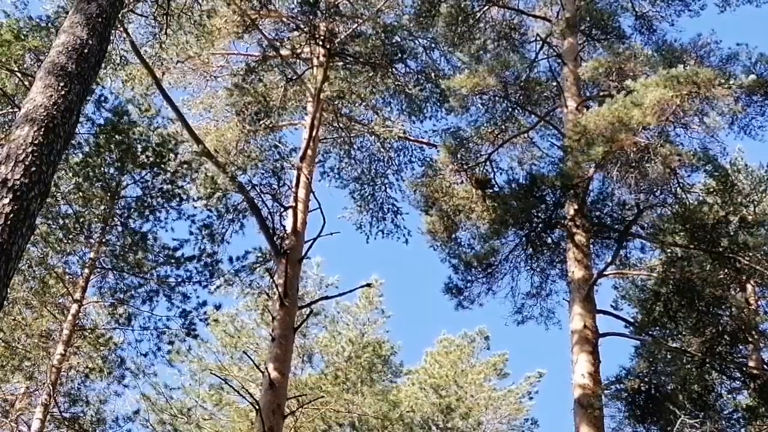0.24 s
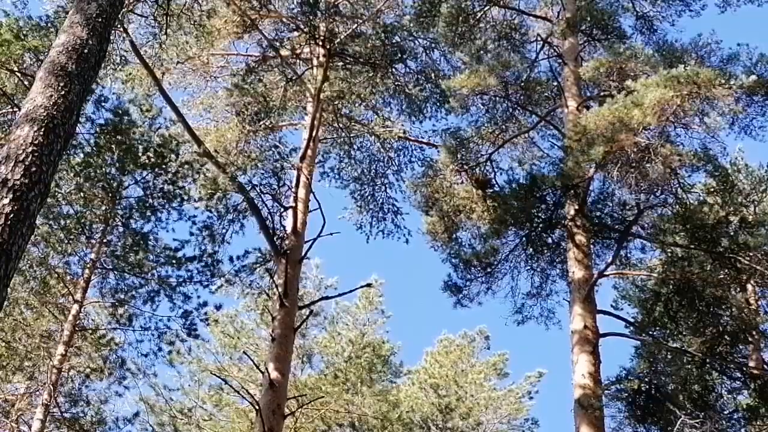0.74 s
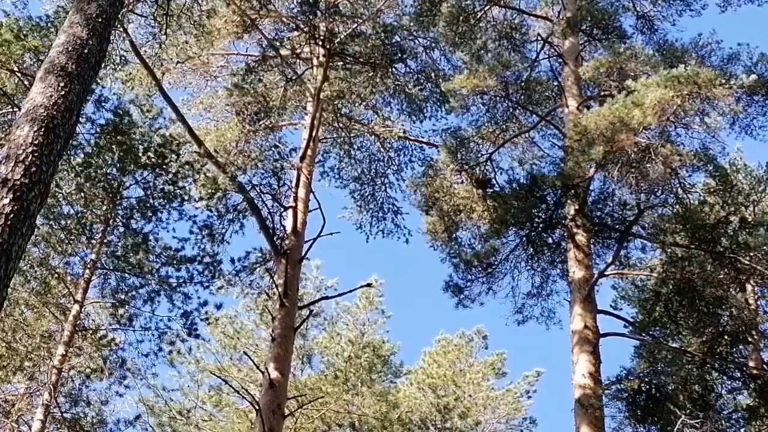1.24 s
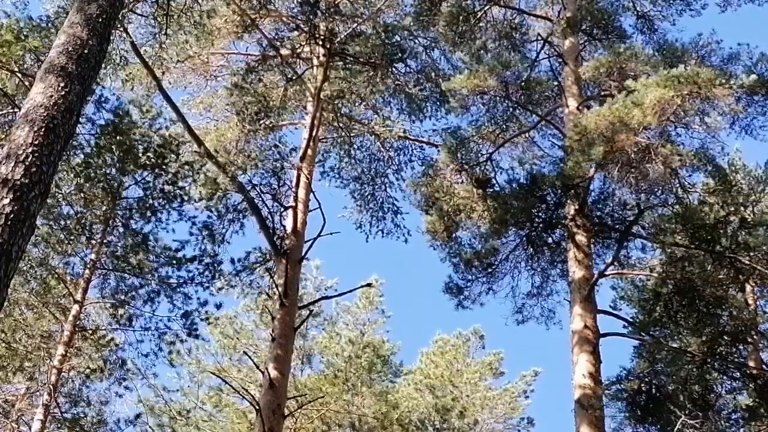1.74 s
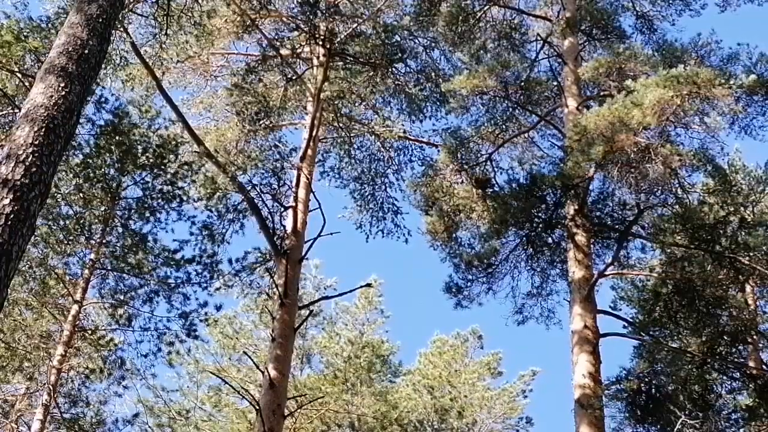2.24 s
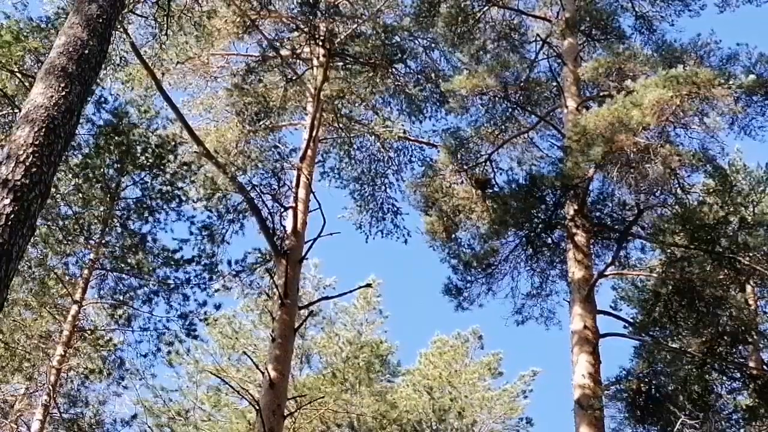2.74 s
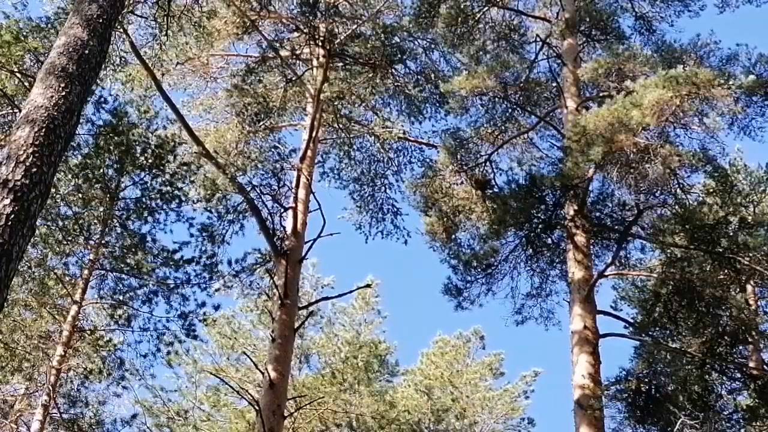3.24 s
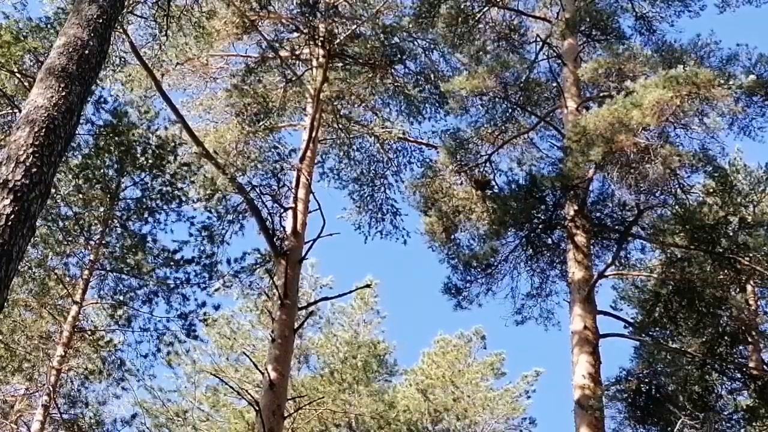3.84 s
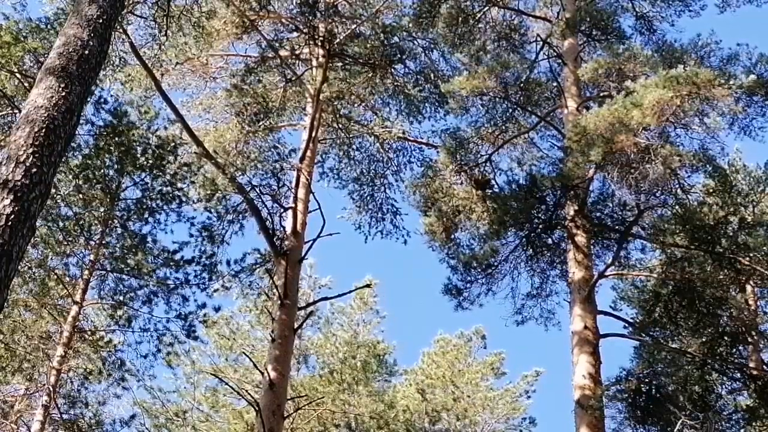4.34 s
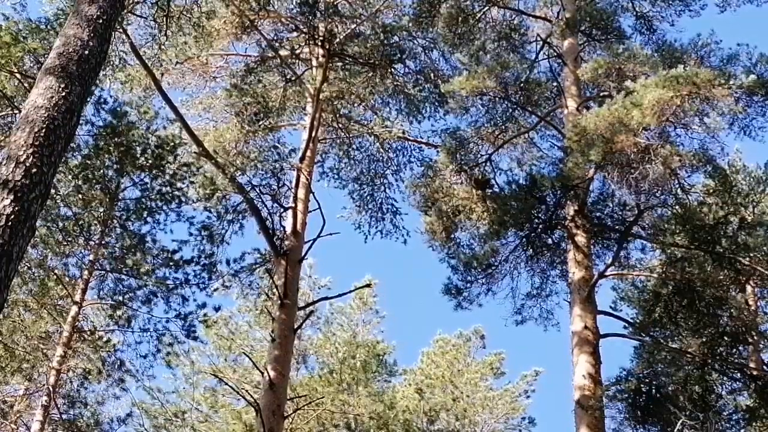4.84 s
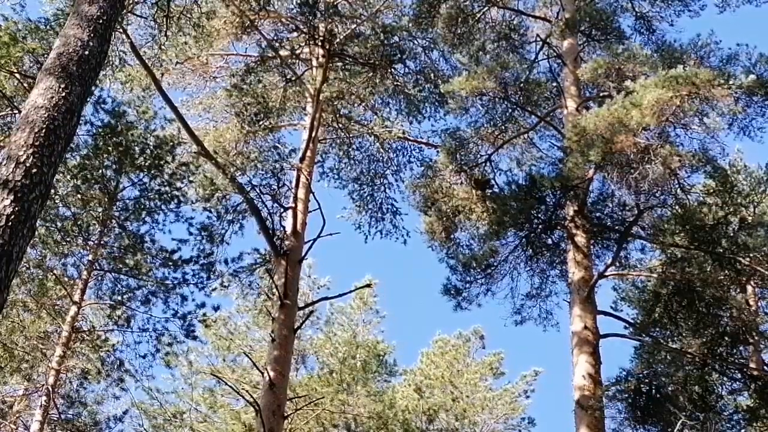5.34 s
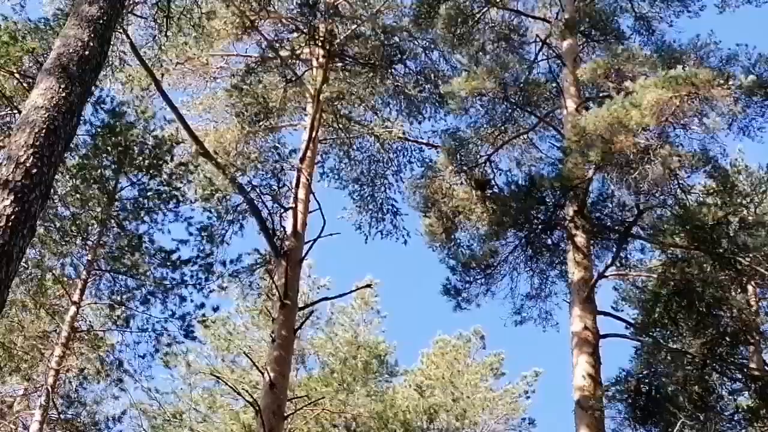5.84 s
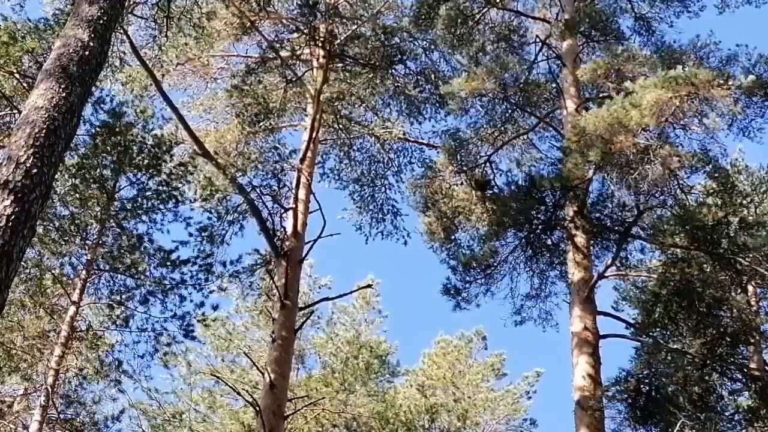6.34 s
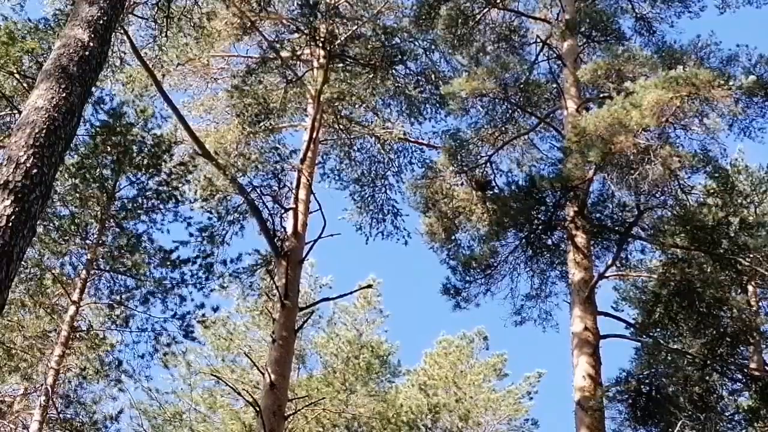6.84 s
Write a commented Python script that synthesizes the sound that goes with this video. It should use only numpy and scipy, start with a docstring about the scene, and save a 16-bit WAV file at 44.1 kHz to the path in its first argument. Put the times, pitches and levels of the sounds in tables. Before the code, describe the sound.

Spring birdsong among tall pines: bright descending finch trills, piercing thin whistles ending in a buzz and sharp note, distant twittering, soft wind.

```python
"""Birds in a spring pine forest

A finch sings its falling trill and flourish twice, built from gliding and fast-wobbling tones.
A nearer bird calls twice: two thin two-voiced whistles, a buzz and a loud rising note.
Other birds call further off as short glides, and a faint squeal holds one pitch.
Random echoes scatter every note as trunks do, over shaped noise for the wind in the crowns.
"""
import sys
import numpy as np
from scipy import signal
from scipy.fft import rfft, irfft, next_fast_len
from scipy.io import wavfile
from scipy.ndimage import uniform_filter1d

SR = 44100
rng = np.random.default_rng(int(sys.argv[2]) if len(sys.argv) > 2 else 0)


def file_out(sig):
    """Save sig as 16-bit WAV at sys.argv[1]."""
    # one column per channel
    cols = np.atleast_2d(sig).T
    # limit, then scale
    lim = np.clip(cols, -1, 1)
    pcm = np.round(lim * 32767).astype(np.int16)
    wavfile.write(sys.argv[1], SR, pcm)


N = 312669


def gain_of(db):
    """Turns decibels into a factor for the sound wave."""
    return 10 ** (np.asarray(db) / 20)


def evened(x):
    """Scales a signal to an average (rms) strength of 1."""
    return x / np.sqrt(np.mean(x ** 2) + 1e-20)


def read(points, hz):
    """Reads a table between its points, with pitch spaced as the ear hears it (logarithmically)."""
    f, value = np.transpose(points)
    return np.interp(np.log(hz + 1), np.log(f + 1), value)


def wander(n, rate_hz):
    """A smooth random curve of strength about 1; a higher rate makes it wander faster."""
    size = next_fast_len(n + SR // 8)
    hz = np.fft.rfftfreq(size, 1 / SR)
    smoothed = rfft(rng.standard_normal(size)) * np.exp(-(hz / rate_hz) ** 2)
    return evened(irfft(smoothed, size))[:n]


def turns(hz):
    """Adds up a pitch curve into the running phase of a vibration."""
    return 2 * np.pi * np.cumsum(hz) / SR


def fade(n, edge_s):
    """A soft start and end."""
    return signal.windows.tukey(n, min(1, 2 * edge_s * SR / n))


def add(mix, s, sound, pan_db=0):
    """Places a sound at a time and a side; positive pan_db makes the left louder."""
    part = mix[:, max(0, round(s * SR)):][:, :len(sound)]
    sides = gain_of(np.array([[.5], [-.5]]) * pan_db)
    part += (sound * sides)[:, :part.shape[1]]


def arrive(x, lag_ms):
    """Sound from one side reaches the right microphone later."""
    lag = int(round(lag_ms * SR / 1000))
    return np.array([x[0], np.roll(x[1], lag)])


def forest(x, early_s=0.023, early_db=6):
    """Trunks and branches scatter sound: strong near echoes, then a tail whose top treble dies first."""
    # time the late echoes take to fall by 60 dB: f/Hz, fall time/s
    echo_times = [(1500, 1.16), (3200, 0.86), (5000, 0.56), (8000, 0.77), (14000, 0.39)]
    echoes_per_s = 2500
    taps = rng.standard_normal((2, SR)) * (rng.random((2, SR)) < echoes_per_s / SR)
    hz, t, z = signal.stft(taps, SR, nperseg=256)
    decay_db = -60 * t / read(echo_times, hz)[:, None] + early_db * np.exp(-t / early_s)
    decay = gain_of(decay_db) * (t > .004)
    tail = signal.istft(z * decay, SR, nperseg=256)[1]
    # set the echo strength by the decay at 4000 Hz
    tail /= np.sqrt(np.sum(taps[0] ** 2) * np.mean(decay[np.searchsorted(hz, 4000)] ** 2))
    return signal.fftconvolve(x, tail, axes=1)[:, :N]


def note(length, start_hz, middle_hz, end_hz, overtone_db=-50, waver=0.0084, flutter_db=3.0):
    """One nearly pure glide of the syrinx, the bird's voice organ; weaker below its middle pitch."""
    n = int(length * SR)
    curve = np.polyfit([0, .5, 1], [start_hz, middle_hz, end_hz], 2)
    hz = np.polyval(curve, np.linspace(0, 1, n))
    phase = turns(hz * (1 + waver * wander(n, 200)))
    overtones = np.sin(2 * phase) + np.sin(3 * phase) * (hz < SR / 6)
    voice = np.sin(phase) + gain_of(overtone_db) * overtones
    flutter = gain_of(flutter_db * wander(n, 100))
    shape = signal.windows.tukey(n, .25) * np.minimum(hz / middle_hz, 1) ** 1.5
    return np.sqrt(2) * voice * flutter * shape


def settling(length, start_hz, held_hz, settle_s, waver=0.0076, flutter_db=3, overtone_db=-50):
    """A note whose pitch slides quickly onto a held one, closing the gap ever more slowly."""
    t = np.arange(0, length, 1 / SR)
    n = len(t)
    hz = held_hz + (start_hz - held_hz) * np.exp(-t / settle_s)
    phase = turns(hz * (1 + waver * wander(n, 200)))
    voice = np.sin(phase) + gain_of(overtone_db) * (np.sin(2 * phase) + np.sin(3 * phase))
    flutter = gain_of(flutter_db * wander(n, 100))
    return np.sqrt(2) * voice * flutter * signal.windows.tukey(n, .4)


def wind(patchy_db=0.5, lumpy_db=2):
    """Noise makes a lumpy rumble, much alike in both ears, under the wide rush of the crowns."""
    # strength of the wind over time: t/s, rumble level/dB, rush level/dB
    wind_levels = [(0.0, -37, -38), (2.3, -35.5, -38), (4.8, -40, -42), (6.1, -41.5, -41.5),
                   (7.09, -38.5, -40.5)]
    # colour of the wind, relative within rumble and rush: f/Hz, level per Hz/dB
    colour = [(20, -6.5), (35, -11.5), (62, -0.5), (110, -13), (180, -12.5), (350, -12.5), (650, -13),
              (1000, -17), (1500, -25.5), (2200, -26.5), (4000, -32.5), (7000, -44.5), (11000, -50),
              (15000, -57)]
    # likeness of left and right: f/Hz, correlation (1 = identical)
    likeness = [(40, 1), (120, 0.7), (250, 0.79), (500, 0.38), (1000, -0.2), (1600, 0.015), (4000, -0.034)]
    frames, hz = N // 512 + 5, np.fft.rfftfreq(2048, 1 / SR)
    a, b, c, d, patches = rng.standard_normal((5, len(hz), frames))
    same = np.clip(read(likeness, hz), -1, 1)[:, None]
    left = a + 1j * b
    right = same * left + np.sqrt(1 - same ** 2) * (c + 1j * d)
    # random patches of louder and softer noise, smoothed over pitch and then time
    patches = uniform_filter1d(patches, size=20, axis=0)
    patches = evened(uniform_filter1d(patches, size=12, axis=1))
    z = np.array([left, right]) * gain_of(read(colour, hz)[:, None] + patchy_db * patches)
    bass = (hz < 150)[:, None]
    rumble = evened(signal.istft(z * bass, nperseg=2048, noverlap=1536)[1][:, :N])
    rush = evened(signal.istft(z * ~bass, nperseg=2048, noverlap=1536)[1][:, :N])
    s, low_db, high_db = np.transpose(wind_levels)
    t = np.arange(N) / SR
    lumps = np.interp(t, np.linspace(0, N / SR, num=80), rng.standard_normal(size=80))
    rumble = rumble * gain_of(np.interp(t, s, low_db) + lumpy_db * lumps)
    return rumble + rush * gain_of(np.interp(t, s, high_db))


def chorus(top_hz=4200, bottom_hz=2750, chip_db=-11, rest_db=-54.5):
    """Far finches: falling notes and higher chips, so scattered that they merge."""
    # swells of the distant trilling: t/s of the peak, width/s, level/dB
    phrase_peaks = [(.3, 0.17, -52), (1.4, 0.46, -41.5), (2.95, 0.12, -37.5), (3.53, 0.25, -42.5),
                    (5.05, 0.17, -45), (5.93, 0.25, -33.5), (6.9, 0.65, -39.5)]
    out = np.zeros((2, N))
    notes_per_s = 60
    for k, (late, pitch) in enumerate(rng.random((int(notes_per_s * N / SR), 2))):
        glide = np.array([top_hz, (top_hz + bottom_hz) / 2, bottom_hz]) * (1 + .2 * (pitch - .5))
        if k % 4 == 0:
            sound = gain_of(chip_db) * note(.06, *glide * 1.75)
        else:
            sound = note(.06, *glide)
        add(out, (k + late) / notes_per_s, sound, 1.5)
    scattered = forest(out, early_db=0)
    # level out the strength over quarter seconds, so that the phrases alone set it
    scattered /= np.sqrt(uniform_filter1d((scattered ** 2).mean(0), SR // 4) + 1e-9)
    t = np.arange(N) / SR
    phrases = sum(gain_of(db) * np.exp(-((t - s) / width) ** 2) for s, width, db in phrase_peaks)
    return scattered * np.hypot(gain_of(rest_db), phrases)


def twitter(level_db=-64, spread_db=4, low_hz=5200, high_hz=8000, slide=0.1, length_s=0.056):
    """Tiny chirps from all over the crowns: short tones sliding up or down."""
    out = np.zeros((2, N))
    per_s = 7
    chances = rng.uniform(-1, 1, (int(per_s * N / SR), 5))
    for k, (late, pitch, bend, effort, side) in enumerate(chances):
        middle_hz = np.interp(pitch, [-1, 1], [low_hz, high_hz])
        glide = middle_hz * (1 + slide * bend * np.array([-.5, 0, .5]))
        chirp = gain_of(level_db + spread_db * effort) * note(length_s, *glide)
        add(out, (k + abs(late)) / per_s, chirp, 4 * side)
    return out + forest(out)


def squeal(pan_db=-6):
    """A thin, faint held tone: a slightly unsteady vibration with a few higher partials."""
    # course of the tone: t/s, f/Hz, level/dB
    squeal_course = [(.59, 1374, -57), (.68, 1372, -51), (.8, 1369, -59), (.96, 1366, -46),
                     (1.02, 1364, -55)]
    # its partials: multiple of the pitch, level/dB against the lowest
    partials = [(1, 0), (2, -6), (3, -10), (7, -12), (8, -20)]
    out = np.zeros((2, N))
    s, pitch_hz, level_db = np.transpose(squeal_course)
    t = np.arange(s[0], s[-1], 1 / SR)
    hz, db = np.interp(t, s, pitch_hz), np.interp(t, s, level_db)
    phase = turns(hz * (1 + 0.0017 * wander(len(hz), 60)))
    tone = sum(gain_of(partial_db) * np.sin(k * phase) for k, partial_db in partials)
    add(out, s[0], gain_of(db) * tone * fade(len(hz), 0.024), pan_db)
    return out + gain_of(-3) * forest(out)


def others(pan_db=-1.0):
    """Four kinds of single notes from the trees around, each a glide or a slide onto a pitch."""
    # short falling notes of a second bird: t/s, level/dB
    falling_notes = [(1.414, -34), (1.527, -34), (1.63, -34), (1.852, -33.5), (1.955, -40), (5.234, -55)]
    # rising calls: t/s, level/dB
    rising_calls = [(4.434, -40), (4.642, -38)]
    # calls that drop quickly onto a held pitch: t/s, level/dB
    dropping_calls = [(3.222, -55.5), (3.365, -59), (3.51, -55), (3.77, -60), (3.912, -39), (4.286, -41.5),
                      (5.22, -57)]
    # very thin, high, sinking notes: t/s, length/s, start f/Hz, end f/Hz, level/dB
    thin_notes = [(1.55, 0.14, 7370, 7270, -57.5), (2.674, .15, 7600, 7420, -59.5),
                  (2.813, .21, 7220, 7000, -54.5), (3.668, 0.05, 7340, 7180, -55),
                  (3.795, .13, 7920, 6750, -55), (5.376, 0.19, 8130, 7150, -57.5)]
    fall_s, fall_glide_hz = .033, (3473, 3080, 2690)
    rise_s, rise_low_hz, rise_held_hz, rise_settle_s = .075, 2630, 4260, .0095
    drop_s, drop_top_hz, drop_held_hz, drop_settle_s = .11, 6300, 5070, .009
    out = np.zeros((2, N))
    for s, db in falling_notes:
        add(out, s, gain_of(db) * note(fall_s, *fall_glide_hz), pan_db)
    for s, db in rising_calls:
        call = settling(rise_s, rise_low_hz, rise_held_hz, rise_settle_s)
        add(out, s, gain_of(db) * call, pan_db)
    for s, db in dropping_calls:
        call = settling(drop_s, drop_top_hz, drop_held_hz, drop_settle_s, waver=0.016)
        add(out, s, gain_of(db) * call, pan_db)
    for s, length, start_hz, end_hz, db in thin_notes:
        thin = note(length, start_hz, (start_hz + end_hz) / 2, end_hz)
        add(out, s, gain_of(db) * thin, pan_db)
    return out


def whistles(flutter_db=2.0, low_octave_db=-7, high_octave_db=-32, sum_db=-33, difference_db=-34):
    """Both sides of the syrinx hold a tone; their coupling adds sum and difference tones."""
    # the near bird's whistles: t/s, length/s, high voice f/Hz, its level/dB,
    # low voice f/Hz, its level/dB, left against right/dB
    whistle_notes = [(4.279, .18, 7900, -24, 5480, -39, -9), (4.574, .094, 7435, -22.5, 5308, -37, 0),
                     (5.964, .172, 7890, -24, 5428, -33, 3), (6.24, .09, 7452, -24, 5285, -33, 7)]
    out = np.zeros((2, N))
    for s, length, high_hz, high_db, low_hz, low_db, pan_db in whistle_notes:
        t = np.arange(0, length, 1 / SR)
        n = len(t)
        # at both ends the high voice bends down and the low voice up
        sag = .016 * (np.exp(-t / .018) + np.exp((t - length) / .008))
        high = turns(high_hz * (1 - sag + .0012 * wander(n, 150)))
        low = turns(low_hz * (1 + .4 * sag + .0015 * wander(n, 150)))
        differences = np.sin(2 * high - low) + np.sin(3 * low - high)
        coupled = gain_of(sum_db) * np.sin(high + low) + gain_of(difference_db) * differences
        upper = np.sin(high) + gain_of(high_octave_db) * np.sin(2 * high) + coupled
        upper *= gain_of(high_db + flutter_db * wander(n, 40))
        lower = np.sin(low) + gain_of(low_octave_db) * np.sin(2 * low)
        lower *= gain_of(low_db + flutter_db * wander(n, 40))
        lower *= np.clip(t / 0.0069 - 1, 0, 1)  # the low voice joins a moment later
        add(out, s, np.sqrt(2) * (upper + lower) * fade(n, .016), pan_db)
    return out


def buzzes(trill_hz=196, high_swing=0.1, overtone_db=-44, high_octave_db=-20, sum_db=-21,
           throb=0.58, uneven_db=2):
    """Two voices trill together; the upper one stops as the lower rises, swells and steadies."""
    # buzz, then loud note: t/s, buzz length/s, low voice level/dB, its mid-buzz change/dB,
    # high voice f/Hz, its level/dB, left against right/dB,
    # note length/s, note f/Hz, note level/dB, note left against right/dB
    buzz_calls = [(4.71, .243, -32, -8.5, 5550, -35, 1.5, 0.066, 4073, -14.5, 5),
                  (6.375, 0.2492, -27.5, -6, 5424, -30.5, 3, 0.097, 4110, -8.5, -10)]
    buzz_hz, low_swing, rise_s = 2883, .11, 0.0063
    trill_depth, trill_dies_s = 0.82, 0.018
    note_fade_db_per_s, release_s = -81, 0.011
    out = np.zeros((2, N))
    for (s, length, low_db, sag_db, high_hz, high_db, pan_db,
         note_s, note_hz, note_db, note_pan_db) in buzz_calls:
        t = np.arange(0, length + note_s, 1 / SR)
        n, held = len(t), np.maximum(t - length, 0)
        risen = 1 / (1 + np.exp((length - t) / rise_s))  # 0 in the buzz, 1 in the note
        depth = trill_depth * np.exp(-held / trill_dies_s)
        buzz_db = low_db + sag_db * np.sin(np.pi * np.minimum(t / length, 1))
        db = buzz_db + (note_db - buzz_db) * risen + note_fade_db_per_s * held
        # the first trills are quicker, and their upper voice is higher
        onset = .1 * np.exp(-t / .025)
        beat = turns(trill_hz * (1 + onset + 0.015 * wander(n, 30)))
        low_pitch = buzz_hz + (note_hz - buzz_hz) * risen
        low = turns(low_pitch * (1 + depth * (low_swing * np.sin(beat) + .026 * wander(n, 700))))
        high_bend = onset + .3 * risen + high_swing * np.sin(beat) + .016 * wander(n, 600)
        high = turns(high_hz * (1 + high_bend))
        lower = np.sin(low) + gain_of(overtone_db) * np.sin(2 * low)
        lower *= (1 - throb * depth * np.cos(beat)) / (1 + throb * depth)
        upper = np.sin(high) + gain_of(high_octave_db) * np.sin(2 * high)
        upper += gain_of(sum_db) * np.sin(high + low)
        upper *= 1 - throb * depth * np.sin(beat)
        voices = gain_of(db) * lower + gain_of(high_db) * (1 - risen) ** 2 * upper
        uneven = gain_of(uneven_db * depth * wander(n, 200))
        shape = uneven * np.minimum(t[::-1] / release_s, 1) * fade(n, .003)
        add(out, s, np.sqrt(2) * voices * shape, pan_db + (note_pan_db - pan_db) * risen)
    return out


def slurs(start, overtone_db=-35):
    """Evenly paced notes settle from a high, soft first one; three varying chips lead into each."""
    # quick chips: lead before the slur/s, length/s, start f/Hz, middle f/Hz, end f/Hz,
    # typical level against the slur/dB
    lead_chips = [(.077, .028, 5200, 5700, 6000, -12), (.06, .024, 4600, 4900, 4900, -7),
                  (.027, .02, 6100, 5250, 4850, -11)]
    count, every_s, slur_s = 5, .193, 0.077
    slur_db, soft_db, settle_s = -26.5, -12.5, 0.195
    top_hz, held_hz, drop_s = 4770, 4300, 0.01687
    high_hz = 270  # how much higher the first slur lies
    out = np.zeros((2, N))
    for since in np.arange(count) * every_s:
        fresh = np.exp(-since / settle_s)
        s, db = start + since, slur_db + soft_db * fresh
        extra_hz = high_hz * fresh + 25 * rng.standard_normal()
        slur = settling(slur_s, top_hz + extra_hz, held_hz + extra_hz, drop_s, overtone_db=overtone_db)
        add(out, s, gain_of(db) * slur)
        for lead, length, *glide, chip_db in lead_chips:
            pitch, effort = rng.standard_normal(2)
            chip = note(length, *np.array(glide) * (1 + .03 * pitch), waver=.025)
            add(out, s - lead, gain_of(db + chip_db + 2 * effort) * chip)
    return out


def sweeps(start, hook_hz=4380, hook_s=0.019, hook_db=-12, sink_db=-5):
    """The faster, lower trill: falling glides, each from a short high hook, reach lower each time."""
    count, at_s, every_s, sweep_s, sweep_db = 4, .895, .137, .071, -23.5  # at_s: time into the song
    top_hz, middle_hz, end_hz, deepen_hz = 4120, 3113, 2350, 140
    out = np.zeros((2, N))
    for k in range(count):
        s = start + at_s + k * every_s
        voice = note(sweep_s, top_hz, middle_hz, end_hz - k * deepen_hz)
        add(out, s, voice * gain_of(sink_db * np.linspace(0, 1, len(voice)) ** 2))
        add(out, s - hook_s, gain_of(hook_db) * note(hook_s, hook_hz, hook_hz, top_hz))
    return gain_of(sweep_db) * out


def rattles(start, rate_hz=120, centre_hz=5700, swing=0.147, rough=0.0624):
    """The pitch is thrown up and down so fast that the note turns harsh."""
    # the rattles: t/s into the song, length/s, level/dB
    rattle_notes = [(1.428, .061, -36.5), (1.507, .04, -30.5)]
    out = np.zeros((2, N))
    for at, length, db in rattle_notes:
        n = int(length * SR)
        beat = turns(rate_hz * (1 + 0.41 * wander(n, 100.7)))
        hz = centre_hz * (1 + swing * np.sin(beat) + rough * wander(n, 550))
        voice = np.sin(turns(hz)) * (1 + np.cos(beat))
        add(out, start + at, gain_of(db) * evened(voice) * fade(n, 0.012))
    return out


def upslur(start):
    """One climbing note between the rattles and the flourish, swelling as it climbs."""
    at_s, length_s, glide_hz = 1.6, .082, (1904, 2445, 3300)
    level_db, swell_db = -23.5, 15.5
    out = np.zeros((2, N))
    voice = note(length_s, *glide_hz)
    add(out, start + at_s, voice * gain_of(level_db - np.linspace(swell_db, 0, len(voice))))
    return out


def flourish(start, pulse_hz=106, swing=0.11, overtone_db=-17, bend=1.55):
    """A train of pulses, each a tiny downward sweep, tumbles and levels out; high ones are brightest."""
    at_s, length_s, level_db, fade_db = 1.748, .29, -30, -7.5
    top_hz, end_hz, fall_s, attack_s = 6016, 2130, .124, 0.038
    out = np.zeros((2, N))
    t = np.arange(0, length_s, 1 / SR)
    n = len(t)
    hz = end_hz + (top_hz - end_hz) * np.exp(-(t / fall_s) ** bend)
    level = np.minimum(t / attack_s, 1) ** 2 * gain_of(level_db + fade_db * (t / length_s) ** 2)
    beat = turns(pulse_hz * (1 + 0.1 * wander(n, 57)))
    phase = turns(hz * (1 - swing * np.sin(beat) + 0.026 * wander(n, 530)))
    brightness = gain_of(overtone_db) * (hz / hz[0]) ** 5
    voice = np.sin(phase) + brightness * (np.sin(2 * phase) + np.sin(3 * phase))
    pulses = voice * (1 + np.cos(beat)) ** 2
    add(out, start + at_s, level * evened(pulses) * fade(n, 0.011))
    return out


def finch(slur_echo_db=3, sweep_echo_db=-2, upslur_echo_db=-2, ending_echo_db=2):
    """Both songs, as heard directly and as sent into the trees; the high parts are scattered more."""
    # the two songs: t/s, direct level/dB, echo level/dB, left against right/dB
    song_starts = [(.835, -1.5, -2, 1.5), (5.528, -7.5, -8, 2.5)]
    direct, scattered = np.zeros((2, 2, N))
    echo = gain_of([slur_echo_db, sweep_echo_db, upslur_echo_db, ending_echo_db])
    for s, direct_db, echo_db, pan_db in song_starts:
        parts = [slurs(s), sweeps(s), upslur(s), rattles(s) + flourish(s)]
        add(direct, 0, gain_of(direct_db) * sum(parts)[0], pan_db)
        scattered += gain_of(echo_db) * sum(share * part for share, part in zip(echo, parts))
    return direct, scattered


def scene(distant_echo_db=-3, whistle_echo_db=-13, buzz_echo_db=-11):
    """Mixes all sounds; the further the bird, the more of it arrives by way of the trees."""
    song, song_echo = finch()
    distant, whistle, buzz = others(), whistles(), buzzes()
    direct = arrive(song, lag_ms=.41)
    direct = direct + arrive(distant + whistle, lag_ms=.023) + arrive(buzz, lag_ms=.045)
    far_sent = song_echo + gain_of(distant_echo_db) * distant
    far_echo = forest(far_sent, early_s=.06, early_db=5)
    near_sent = gain_of(whistle_echo_db) * whistle + gain_of(buzz_echo_db) * buzz
    near_echo = forest(near_sent, early_s=.035, early_db=23)
    return direct + far_echo + near_echo + squeal() + twitter() + chorus() + wind()


def record(dry):
    """The recorder's band limit: a filter removes what lies above its edge."""
    edge_hz = 15200
    low_pass = signal.firwin(511, edge_hz, window=("kaiser", 9), fs=SR)
    return signal.oaconvolve(dry, low_pass[None], "same")


dry = scene()
out = record(dry)
file_out(out)
```